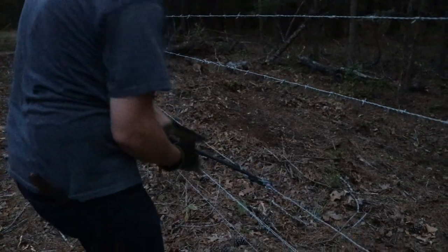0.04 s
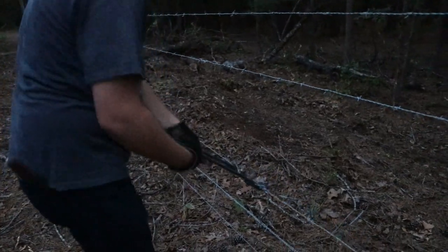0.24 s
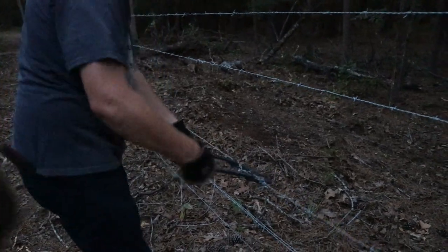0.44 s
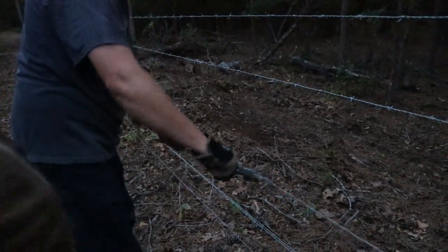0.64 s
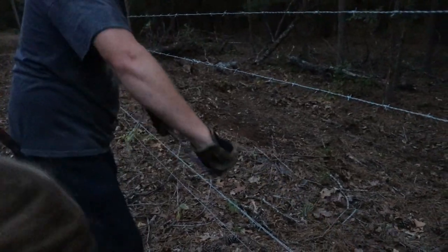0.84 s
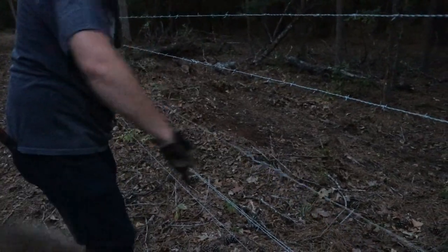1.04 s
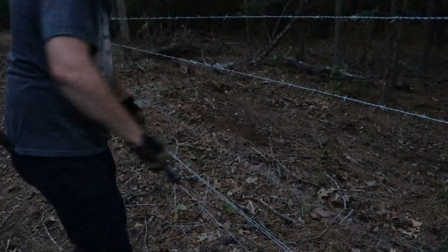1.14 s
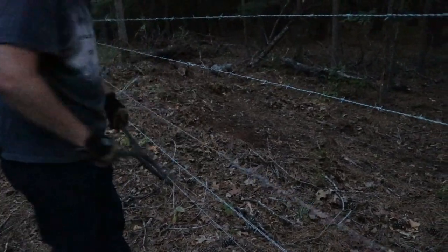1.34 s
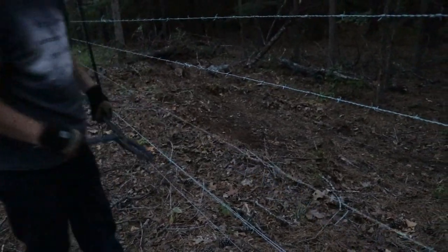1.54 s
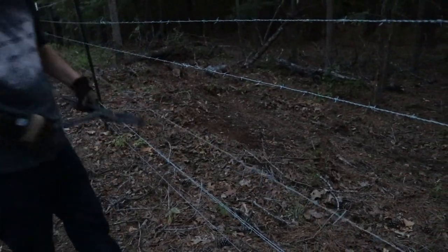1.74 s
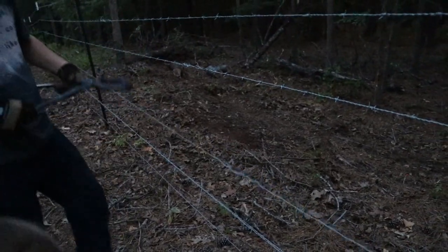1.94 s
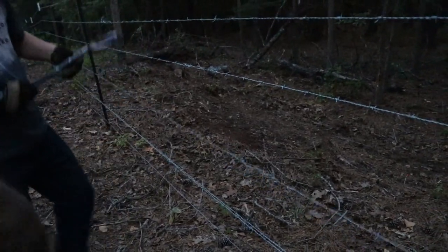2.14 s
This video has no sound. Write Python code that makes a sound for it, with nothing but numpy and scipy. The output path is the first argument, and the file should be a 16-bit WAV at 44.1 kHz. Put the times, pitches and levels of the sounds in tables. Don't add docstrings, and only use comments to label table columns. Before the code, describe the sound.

Small steel links clink and jingle very high as a hand tool works along barbed wire.

```python
import sys
import numpy as np
from scipy import signal
from scipy.fft import rfft, irfft
from scipy.io import wavfile
from scipy.ndimage import uniform_filter1d

SR = 44100
rng = np.random.default_rng(int(sys.argv[2]) if len(sys.argv) > 2 else 0)


def to_linear_factor(level_db):
    exponent = np.asarray(level_db, float) / 20
    return 10 ** exponent


def transcribe(u):
    v = np.clip(np.atleast_2d(u).T, -1, 1)
    q = np.round(v * 32767).astype(np.int16)
    wavfile.write(sys.argv[1], SR, q)


N = 97020
T = np.arange(N) / SR

# frequency in Hz, density in dB per Hz.
AIR_SPECTRUM = [(40, -11), (300, -4.5), (1500, -13), (5300, -31), (8900, -4), (11000, -35), (16000, -24)]
# time in seconds, rustle level in dB.
MOVEMENT = [(0, -50.5), (.2, -52.5), (.3, -48), (.5, -42.5), (.56, -50), (.79, -50), (.84, -42.5),
            (.97, -44), (1.1, -48.5), (1.25, -54), (1.31, -51.5), (1.42, -60), (1.56, -49.5), (1.8, -52.5),
            (1.93, -47.5), (2.04, -56.5), (2.2, -58.5)]
# frequency in Hz, density in dB per Hz.
RUSTLE_SPECTRUM = [(100, -7.5), (300, -4), (1740, -1), (3100, -3.5), (8500, -4), (10900, -9.5),
                   (16000, -11)]
# start in
# seconds, level in dB, centre in Hz.
TICKS = [(0.163, -25, 7100), (.243, -8.5, 8290), (.252, -33, 1500), (0.51, -34, 1600),
         (0.519, -31, 750), (0.522, -22, 1750), (0.529, -23.5, 584), (0.581, -29.5, 562),
         (0.6108, -26, 3240), (0.612, -17.5, 8000), (.6175, -22.5, 3500), (0.654, -23, 2960),
         (0.725, -22, 8000), (.853, -25, 5000), (.894, -18.5, 2500), (0.935, -30, 1420),
         (.954, -25.5, 1630), (.966, -24, 1710), (.979, -32, 900), (1.016, -26, 2300),
         (1.037, -33, 800), (1.059, -25, 1900), (1.078, -24, 4030), (1.104, -24, 348),
         (1.104, -23, 1900), (1.179, -27, 2380), (1.306, -22.5, 3320), (1.441, -38.5, 1510),
         (1.467, -31, 6000), (1.502, -28.5, 503), (1.565, -22.5, 4800), (1.584, -25, 1400),
         (1.604, -33, 684), (1.627, -31.5, 1230), (1.667, -24.5, 7500), (1.689, -28, 6540),
         (1.710, -27, 6000), (1.876, -32.5, 1550), (1.926, -34, 1520), (1.979, -35, 2400),
         (1.988, -37, 2200), (2.1846, -22.5, 2000)]
# start in seconds, length in seconds, level in dB, centre in Hz.
WIRE_SCRAPES = [
    (0.051, 0.064, -34, 2450),
    (0.311, 0.1, -33.5, 7160),
    (.504, 0.034, -34.5, 1650),
    (0.631, 0.13, -44.5, 1910),
    (1.456, 0.036, -45, 5000),
    (1.46, 0.034, -43, 1030),
    (1.507, 0.059, -40, 695),
    (1.507, 0.054, -43, 4000),
    (1.719, 0.034, -35, 6050),
    (1.959, 0.062, -42.5, 2850),
]
# time in seconds, pitch in Hz, level in dB.
BARB_SQUEAL = [
    (1.872, 6950, -55),
    (1.89, 6830, -39),
    (1.905, 6850, -31),
    (1.912, 7095, -23),
    (1.927, 7085, -18.5),
    (1.942, 7070, -23.5),
    (1.958, 7050, -24.5),
    (1.969, 7055, -47),
    (2.09, 7050, -66),
]
# frequency in Hz, level in dB, t60 in seconds.
HANDLE_MODES = [(1096, -1, .014), (1480, 8.5, 0.014), (2283, 10.5, 0.017), (3410, 3, 0.025),
                (3564, -2, 0.046), (3980, -6, 0.031), (4750, -1, 0.027), (5620, -8, 0.038),
                (7020, -1.5, 0.024), (7890, -0.5, 0.04), (9120, -2, 0.028), (10030, -13.5, 0.28)]
# start in seconds, level in dB, damping share (1 = free),
# frequency favoured by the striking point in Hz.
HANDLE_KNOCKS = [(.675, -30.5, 0.32, 3410), (.702, -31.5, 0.34, 3470), (.709, -40, 0.49, 3400),
                 (.744, -31, .3, 3410), (.768, -35, 0.46, 3410), (.838, -25, 0.31, 2330),
                 (1.273, -37.5, 0.7, 1920), (1.329, -37, 0.38, 2420), (1.383, -27.5, 0.31, 3470),
                 (1.5002, -8.5, 0.89, 2530), (1.508, -16, 0.39, 3370), (1.521, -34, 0.29, 8500),
                 (1.690, -35, 0.3, 3500), (1.7255, -29, 0.31, 3880), (1.738, -23, 0.24, 4750),
                 (1.747, -37, 0.24, 3500), (2.107, -43, 0.25, 3410), (2.122, -40, .3, 3410),
                 (2.1545, -36, 0.45, 4750), (2.1705, -27, 0.27, 3350), (2.1846, -21.5, 0.38, 3600),
                 (2.1855, -17, 0.15, 5640), (2.1965, -33, 0.53, 2620)]
# frequency in Hz, level in dB, t60 in seconds.
JAW_MODES = [(1720, 6, 0.023), (2500, -0.5, 0.034), (3430, 2, 0.026), (4280, 2, 0.032), (5240, -1, .03),
             (7630, 2.5, 0.05)]
# start in seconds, level in dB, damping share (1 = free),
# frequency favoured by the striking point in Hz.
JAW_SNAPS = [
    (.002, -26.5, 1, 3540),
    (.005, -22, 0.38, 2500),
    (0.060, -23.5, 0.3, 3800),
    (.068, -29, .45, 2200),
    (.072, -28, 0.51, 1900),
    (.083, -28.5, 0.88, 2600),
    (.092, -30.5, 0.8, 5500),
    (.106, -40, .4, 7500),
    (.108, -37, .3, 1720),
]
# frequency in Hz, level in dB.
LINK_RINGS = [(12150, -15), (12270, -9), (12340, -6), (12410, -4), (12810, -5), (12860, -2), (13710, -6),
              (13790, -3)]
RING_FAMILY_EDGES = [12600, 13400]
# start
# in seconds, # peak in dB, middle ring in dB, upper ring in dB, ring t60 in seconds.
EARLY_CLINKS = [(0.0159, -26, -27, -22, 0.24), (0.0483, -31, -18, -17.5, 0.24),
                (0.0927, -22, -16.5, -15, 0.16), (0.106, -25, -17, -20.5, 0.12),
                (0.164, -24, -12, -23, 0.11), (0.227, -6.5, -19, -13.5, 0.63),
                (0.2431, -12.5, -7.5, -7, 0.26), (0.2654, -10, -5, -20, 0.26),
                (0.3038, -7, -11.5, -15, 0.13), (0.3395, -7.5, -25, -27, 0.043),
                (0.3544, -1, -19, -33, 0.083), (0.3734, -4, -17, -35, 0.046), (0.3908, -26, -25, -31, 0.11),
                (0.437, -16, -5, -15, 0.083), (0.5547, -23, -20, -20.5, 0.055),
                (0.5827, -21, -22, -17, 0.24), (0.6822, -24, -6, -23, 0.032), (0.7723, -25, -13, -17, 0.077)]
LATE_CLINKS = [(0.8228, -13.5, -25, -28.5, 0.092), (0.8334, -8.5, -22, -18.5, 0.019),
               (0.8994, -15.5, -11.5, -19, 0.093), (0.9443, -17.5, -4.5, -8, 0.3),
               (1.0144, -19.5, -26, -26, 0.17), (1.0831, -7, -27.5, -16, 0.067),
               (1.1319, -11.5, -23, -21, 0.031), (1.18, -21, -26, -11, 0.044),
               (1.2066, -30.5, -12, -32, 0.14), (1.503, -29, -12, -5, 0.11), (1.591, -36.5, -14, -23, 0.2),
               (1.6332, -31, -7, -10, 0.12), (1.6578, -23, -16.5, -23, 0.1),
               (1.6667, -16.5, -27, -29, 0.062), (1.688, -25, -17, -20, .08),
               (1.7015, -12.5, -21, -25, 0.043), (1.710, -28, -14, -2, 0.057),
               (1.7264, -21, -10, -15, 0.05), (1.7305, -8, -12, -6.5, 0.046),
               (1.738, -22, -12, -22, 0.035), (1.748, -30.5, -22, -20, 0.17), (2.111, -55, -7, -20, .08),
               (2.129, -47, -5, -20, .1), (2.1768, -28, -16, -26, 0.21)]


def level(x, db):
    return x * to_linear_factor(db) / np.sqrt(np.mean(x ** 2))


def curve(rows, axis=1):
    rows = np.array(rows)
    return np.interp(T, rows[:, 0], rows[:, axis])


def walk(rate):
    hold = int(SR / rate)
    steps = np.repeat(rng.standard_normal(N // hold + 1), hold)
    return 1.4 * uniform_filter1d(uniform_filter1d(steps, hold), hold)[:N]


def colour(x, points):
    point_hz, point_db = np.array(points).T
    hz = np.arange(len(x) // 2 + 1) * SR / len(x) + 1
    return irfft(rfft(x) * to_linear_factor(np.interp(np.log(hz), np.log(point_hz), point_db)), len(x))


def butter(x, order, hz, kind):
    return signal.sosfilt(signal.butter(order, hz, kind, fs=SR, output="sos"), x)


def add(out, s, x):
    i = max(int(s * SR), 0)
    out[i:i + len(x)] += x[:N - i]


def ring(hz, db, t60, phase):
    t = T[:SR // 4, None]
    fade = to_linear_factor(db - 60 * t / np.clip(t60, 0.005, 3))
    return (fade * np.sin(2 * np.pi * hz * t + phase)).sum(axis=1)


def sparks(rate, spread_db):
    size = to_linear_factor(spread_db * np.minimum(rng.exponential(size=N), 4))
    return (rng.random(N) < rate / SR) * rng.standard_normal(N) * size


def wood():
    air = level(colour(rng.standard_normal(N), AIR_SPECTRUM), -55.5)
    insects = butter(rng.standard_normal(N), 1, [7900, 9500], "band")
    wind = butter(rng.standard_normal(N), 2, 37.6, "low")
    return air + level(insects * to_linear_factor(walk(25.2)), -51) + level(wind * to_linear_factor(walk(7.0)), -60)


def rustle():
    grains_per_s, hiss_share = 5000, 0.33
    out = 0
    for edges in [(80, 1200), (1200, 4000), (4000, 17000)]:
        grains = level(sparks(grains_per_s * to_linear_factor(3.2 * walk(40)), 3), 0)
        grains = grains + hiss_share * rng.standard_normal(N)
        out = out + to_linear_factor(walk(24.67)) * butter(grains, 2, edges, "band")
    return level(colour(out, RUSTLE_SPECTRUM), 6) * to_linear_factor(curve(MOVEMENT))


def ticks():
    out, t = np.zeros(N), T[:SR // 20]
    for s, db, hz in TICKS:
        age = t * hz / 0.36
        add(out, s, to_linear_factor(db + 9.5) * np.sin(2 * np.pi * hz * t) * age * np.exp(-age))
    return out


def scrapes():
    out = np.zeros(N)
    grit = level(sparks(9000, 2.2), 0)
    for s, length, db, hz in WIRE_SCRAPES:
        i, n = int(s * SR), int(length * SR)
        band = butter(grit[i:i + n], 1, [hz * 0.65, hz * 1.45], "band")
        swell = np.sin(np.pi * np.arange(n) / n) ** 1.83
        add(out, s, level(band, db) * swell)
    return out


def squeal():
    pitch = curve(BARB_SQUEAL) * (1 + 0.004 * walk(200))
    phase = 2 * np.pi * np.cumsum(pitch) / SR
    on = (T > BARB_SQUEAL[0][0]) & (T < BARB_SQUEAL[-1][0])
    tone = np.sin(phase) + to_linear_factor(-23 + 3.5 * walk(92.7)) * np.sin(2 * phase)
    rough_db = 1.1 * walk(250)
    return on * np.sqrt(2) * to_linear_factor(curve(BARB_SQUEAL, axis=2) + rough_db) * tone


def clanks(rows, modes):
    focus_db, crack_gain = 1.5, 3.8
    out, (hz, db, t60) = np.zeros(N), np.array(modes).T
    luck, t = rng.standard_normal((len(rows), 2, len(hz))), T[:SR // 4]
    buzz_db = 3 * walk(500)
    crack_spectrum = [(400, -14), (2000, -7.5), (8000, -10.5), (13000, -21.5)]
    crack_fade = np.exp(-t / 0.0045) + 0.081 * np.exp(-t / 0.016)
    for k, (s, hit_db, damp, near_hz) in enumerate(rows):
        off_focus_db = focus_db * np.abs(np.log2(hz / near_hz)) * damp ** -2
        mode_hz = hz * (1 + 0.0021 * luck[k, 1])
        body = ring(mode_hz, db + luck[k, 0] - off_focus_db, t60 * min(damp + 0.55, 1), 0)
        body = body * to_linear_factor(np.roll(buzz_db, -int(s * SR))[:len(t)] * np.exp(-t / 0.011))
        crack = colour(rng.standard_normal(len(t) + 1), crack_spectrum)[1:]
        crack = crack * min(damp, 1) * crack_fade
        add(out, s, to_linear_factor(hit_db - 5) * (body * (1 - np.exp(-t / 0.00079)) + crack_gain * crack))
    return out


def chatter():
    hz, db = np.array(LINK_RINGS).T
    taps = np.zeros(N)
    for _ in range(3):
        link = ring(hz, db + 5 * rng.standard_normal(len(hz)), 0.021, 0)
        taps += signal.fftconvolve(sparks(250, 0.58), link)[:N]
    return level(taps, -1.5) * to_linear_factor(curve(MOVEMENT))


def clinks():
    scatter_db, lift_db, lift_s = 4, 1.5, 0.0015
    out, (hz, db) = np.zeros(N), np.array(LINK_RINGS).T
    family = np.searchsorted(RING_FAMILY_EDGES, hz)
    rows = list(EARLY_CLINKS) + list(LATE_CLINKS)
    luck, t = rng.standard_normal((len(rows), 3, len(hz))), T[:SR // 4]
    jangle_spectrum = [(11300, -27.5), (12300, 7.5), (14000, -11), (15500, -30)]
    jangle = level(colour(sparks(4400, 2.9), jangle_spectrum), 0)
    jangle_shape = to_linear_factor(-8.5 - 60 * t / 0.041) * (1 - np.exp(-t / 0.0019))
    for k, (s, peak_db, mid_db, up_db, t60) in enumerate(rows):
        gains = np.array([-9, mid_db, up_db])[family] + db + scatter_db * luck[k, 0] + 3
        ring_hz = hz * (1 + 0.00205 * luck[k, 2, 0] + 0.00142 * luck[k, 2])
        x = ring(ring_hz, gains, t60 * (1.2 - 0.13 * family), 1.36 * luck[k, 1])
        x = x * (1 - np.exp(-t / 0.00089))
        for later in rows[k + 1:k + 4]:
            x = x * to_linear_factor(lift_db * np.clip((t - later[0] + s) / lift_s, 0, 1))
        contact = np.diff(rng.standard_normal(len(t) + 1)) * np.exp(-t / 0.0028)
        x = x + to_linear_factor(-21) * contact
        x = x + jangle_shape * np.roll(jangle, -int(s * SR))[:len(t)]
        add(out, s, to_linear_factor(peak_db + 0.5) * x)
    return out


def scene():
    links, barb = clinks(), squeal()
    steel = clanks(HANDLE_KNOCKS, HANDLE_MODES) + clanks(JAW_SNAPS, JAW_MODES)
    hits = butter(steel + ticks(), 2, 300, "high") + scrapes()
    t = T[:SR // 4]
    tail = rng.standard_normal(len(t)) * to_linear_factor(-60 * t / 0.18) * (t > 0.004)
    echo = signal.fftconvolve(hits + 0.19 * links, tail / np.sqrt(np.sum(tail ** 2)))[:N]
    return (hits + links + barb + to_linear_factor(-18.5) * echo + chatter() + rustle() + wood())[None]


def roll_off(x):
    return signal.sosfilt(signal.butter(12, 16460, fs=SR, output="sos"), x)


def record(dry):
    mix = signal.sosfilt(signal.ellip(8, 0.2, 60, 15700, fs=SR, output="sos"), dry)
    return roll_off(mix)


dry = scene()
out = record(dry)
transcribe(out)
```